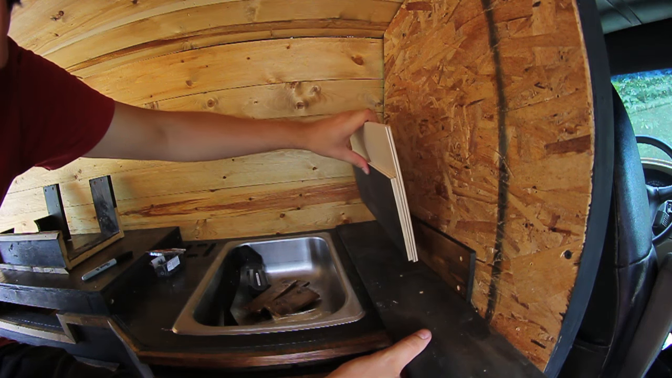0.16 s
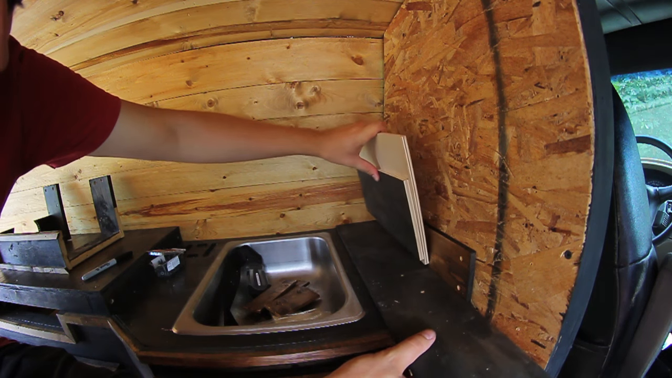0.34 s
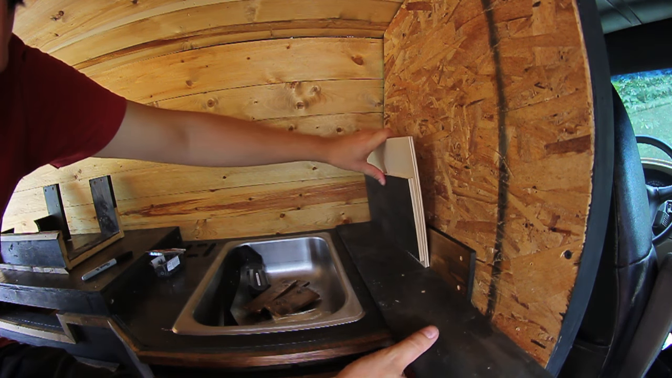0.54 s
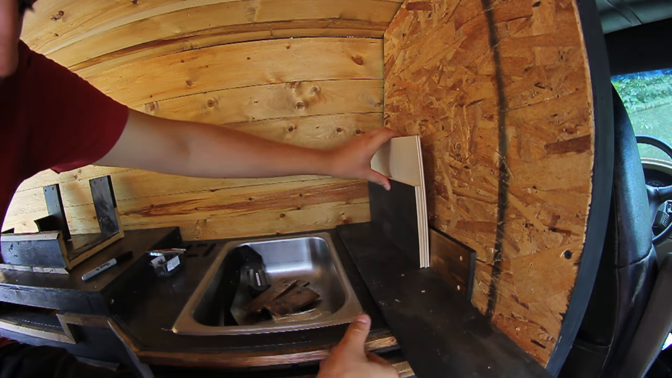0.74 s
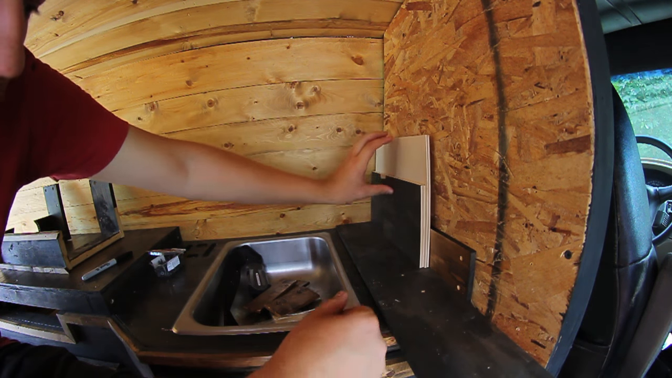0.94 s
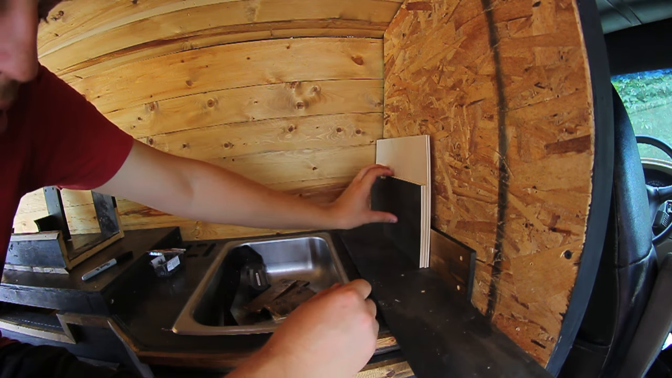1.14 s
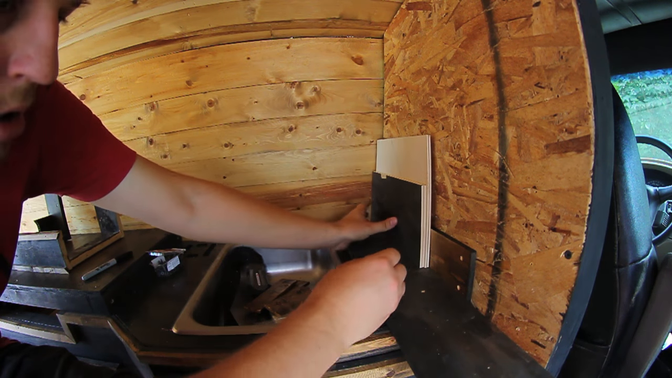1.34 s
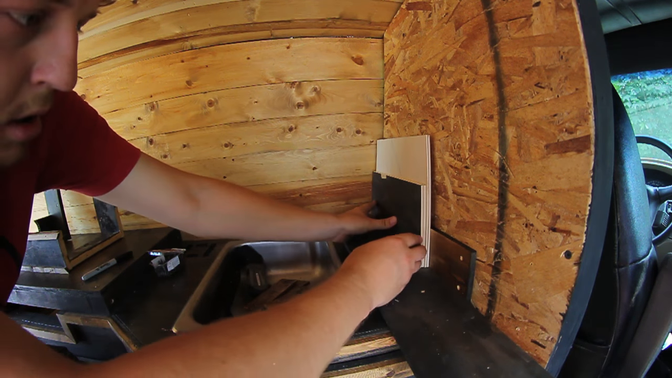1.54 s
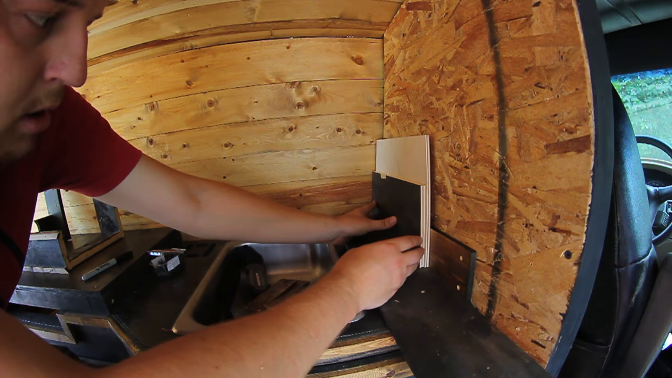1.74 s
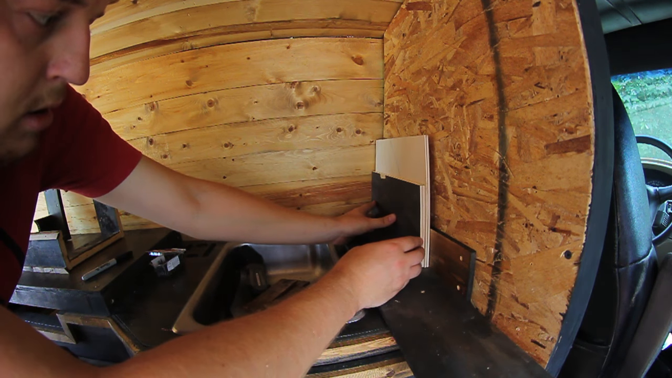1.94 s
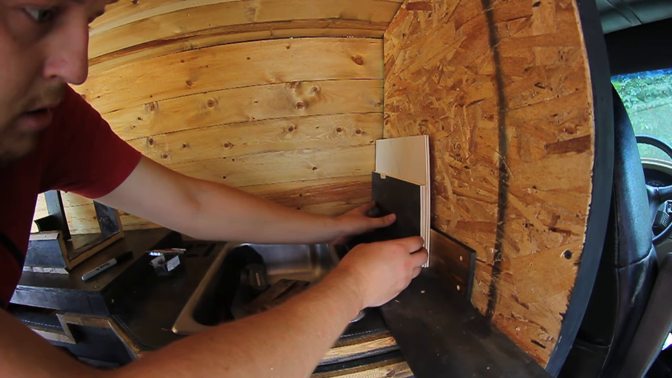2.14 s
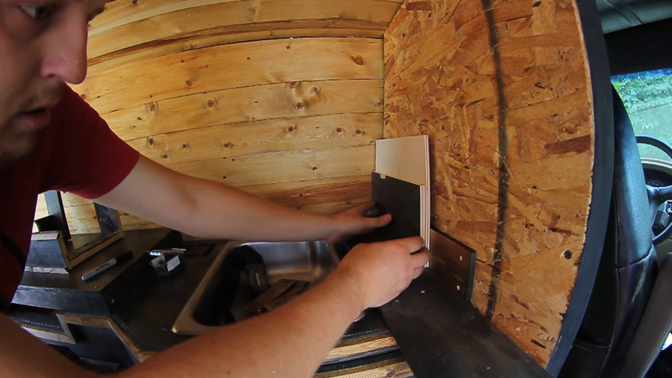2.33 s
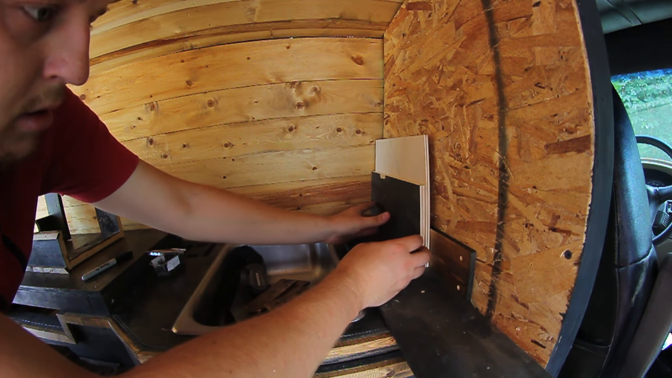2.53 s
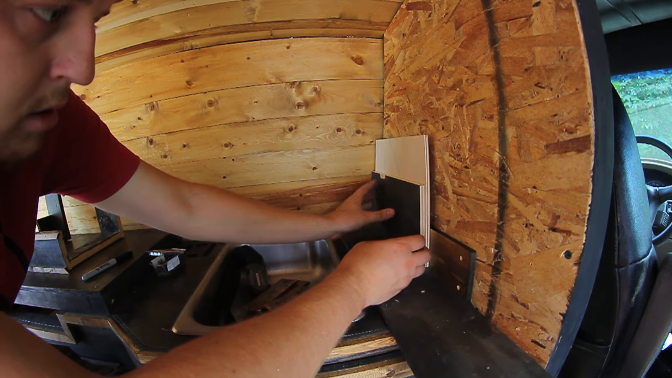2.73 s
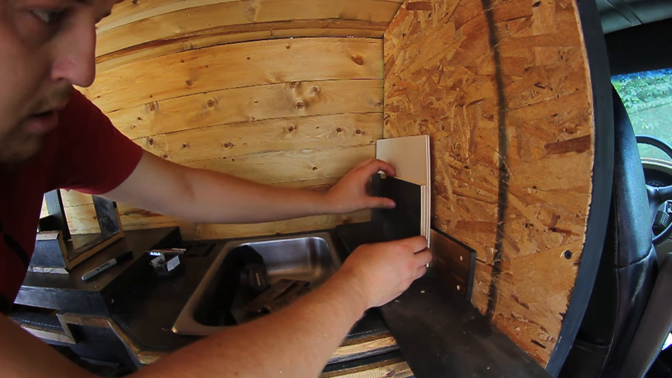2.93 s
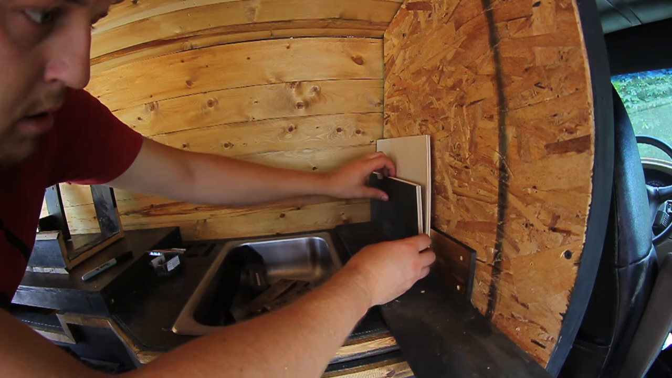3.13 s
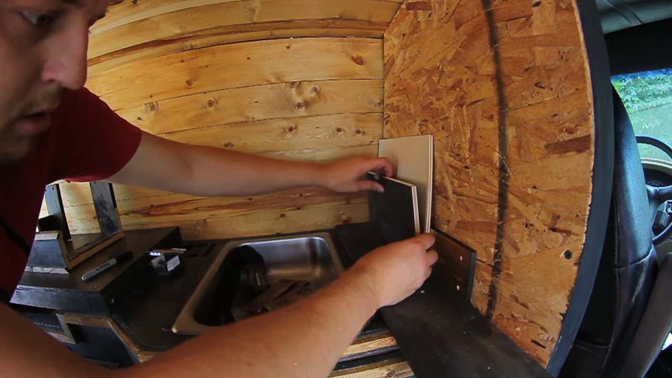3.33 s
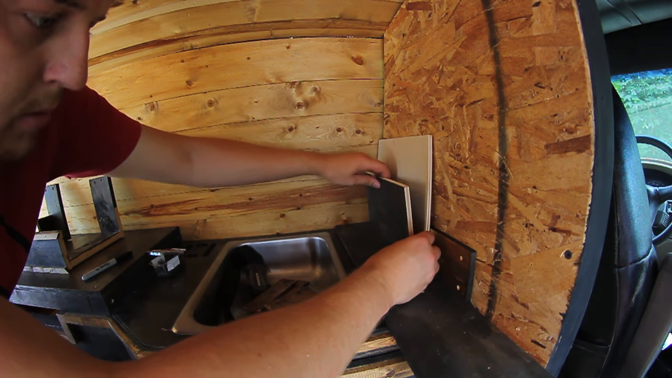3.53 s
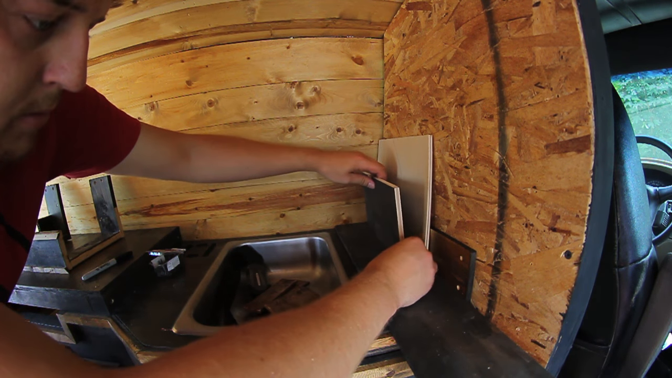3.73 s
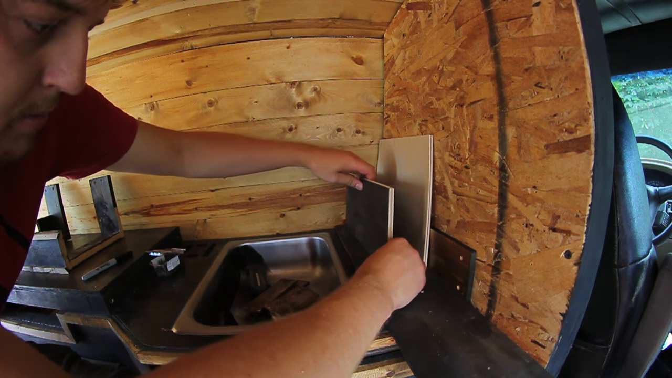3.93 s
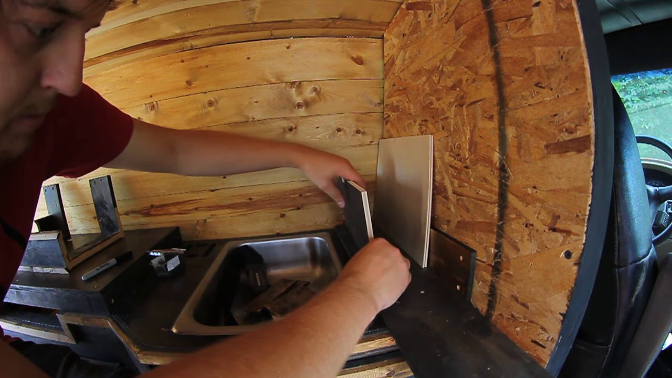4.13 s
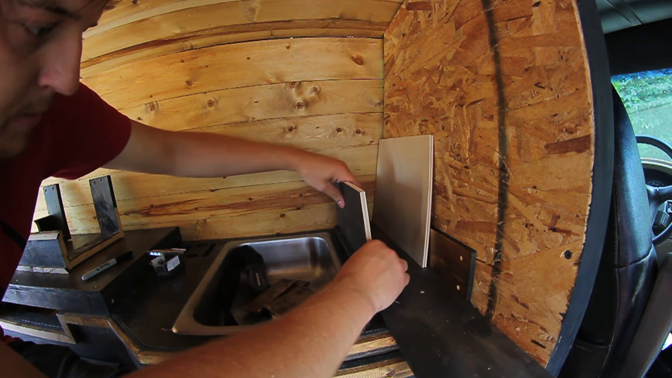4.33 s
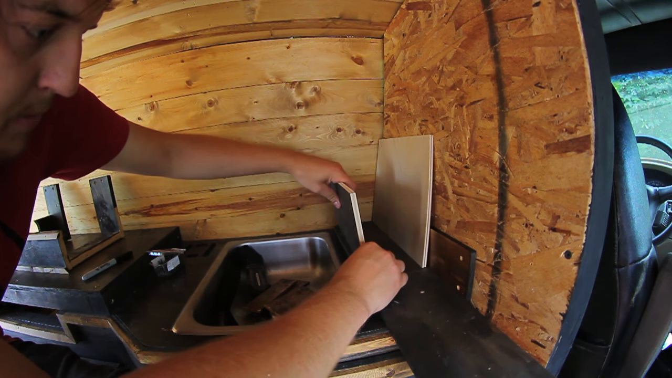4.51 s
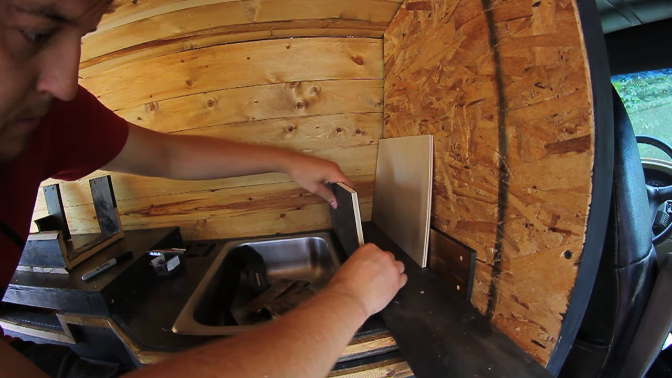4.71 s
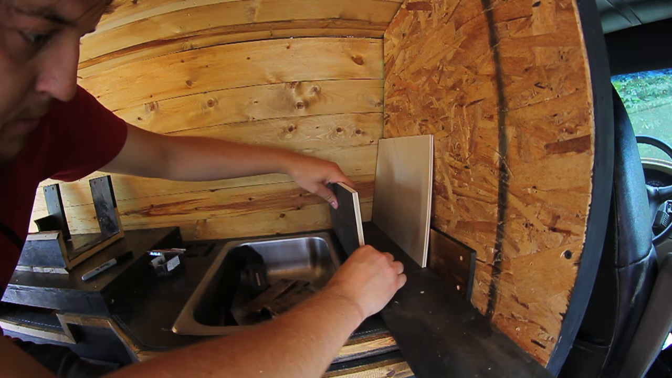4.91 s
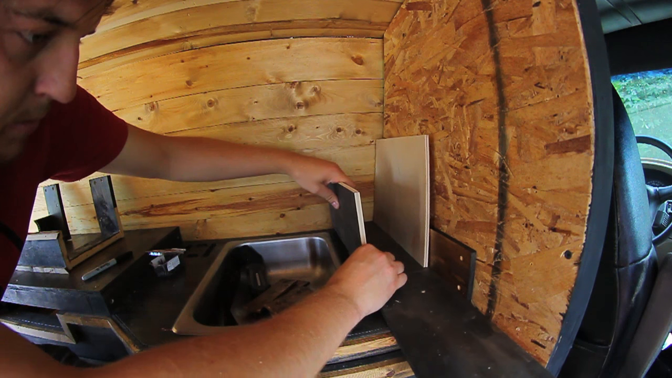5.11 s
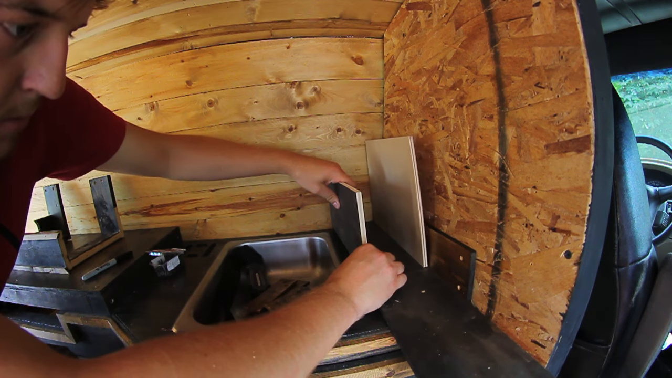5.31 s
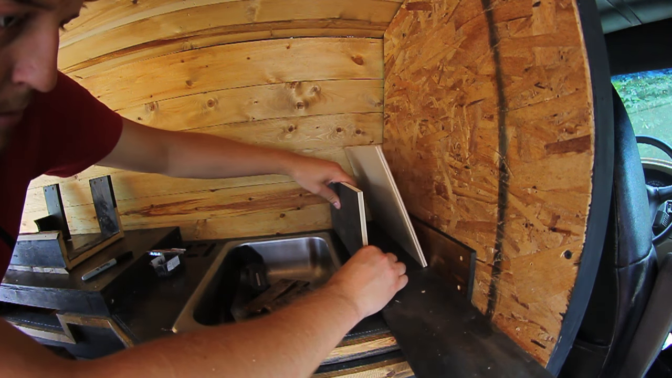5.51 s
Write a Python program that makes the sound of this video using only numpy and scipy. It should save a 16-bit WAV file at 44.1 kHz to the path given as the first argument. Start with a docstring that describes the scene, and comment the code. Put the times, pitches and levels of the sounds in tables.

```python
"""Plywood boards in a van

Two thin plywood boards are stood on a hollow counter in a small wood-lined van and slid against each
other. Each knock rings the board and thumps the cabinet under it. Between knocks edges scrape and faces
rub: a dense rain of tiny slips in the board's resonances. The van adds a short, boomy tail over a
quiet background."""
import sys
import numpy as np
from scipy import signal
from scipy.fft import rfft, irfft, next_fast_len
from scipy.io import wavfile
from scipy.ndimage import uniform_filter1d, map_coordinates

SR = 44100
rng = np.random.default_rng(int(sys.argv[2]) if len(sys.argv) > 2 else 0)


def inscribe(sig):
    """Save sig as 16-bit PCM at rate SR to the path in sys.argv[1].

    A 1-D sig is mono; a 2-D sig holds one channel per row.
    Samples are clipped to [-1, 1] before scaling.
    """
    pcm = np.round(np.clip(np.atleast_2d(sig).T, -1, 1) * 32767)
    wavfile.write(sys.argv[1], SR, pcm.astype(np.int16))


N = 245195
EVENT_N = SR  # samples per event
EVENT_TIME_S = np.arange(EVENT_N) / SR
LN_1000 = np.log(1000)  # 60 dB in nepers


def undb(db):
    """Decibels to gain."""
    return 10 ** (np.asarray(db) / 20)


def unit(x):
    """Scale to rms 1."""
    return x / np.sqrt(np.mean(x ** 2))


def unit_hit(x):
    """Scale to the energy of 10 ms at rms 1."""
    return x / np.sqrt(np.sum(x ** 2) / (SR / 100))


def at(points, hz):
    """Read (freq_hz, value) points on a log-frequency axis."""
    f, value = np.transpose(points)
    return np.interp(np.log(np.maximum(hz, 1)), np.log(f), value)


def add(out, start_s, x):
    """Mix x into out."""
    i = int(start_s * SR)
    out[i:i + len(x)] += x[:len(out) - i]


def through(x, response):
    """Filter by a complex response(freq_hz)."""
    size = next_fast_len(2 * len(x))
    return irfft(rfft(x, size) * response(np.fft.rfftfreq(size, 1 / SR)), size)[:len(x)]


def resonate(x, hz, width_hz, db=0):
    """One resonance with peak gain db."""
    return through(x, lambda f: undb(db) * 1j * f * width_hz / (hz ** 2 - f ** 2 + 1j * f * width_hz))


def lag(force, lag_s):
    """Ringing follows the rubbing force with a short lag."""
    return through(force, lambda f: 1 / (1 + 2j * np.pi * f * lag_s))


def soften(x, corner_hz, damping=1.352):
    """A yielding contact passes little above its corner."""
    return through(x, lambda f: 1 / (1 + damping * 1j * f / corner_hz - (f / corner_hz) ** 2))


def walk(rate_hz):
    """Random wander at rms 1."""
    hold = int(SR / rate_hz)
    steps = np.repeat(rng.standard_normal(N // hold + 1), hold)
    return unit(uniform_filter1d(steps, hold)[:N])


def drift(x, share):
    """Let the pitch wander by a share of itself."""
    return map_coordinates(x, [np.cumsum(1 + share * walk(11))], order=3, mode="mirror")


def ring(modes, scatter_db, detune):
    """Decaying modes: the strike point sets each size and sign, the grip shifts the pitch."""
    t, out = EVENT_TIME_S, 0
    for hz, db, t60_s in modes:
        size, shift, side = rng.standard_normal(3)
        tone = np.sin(2 * np.pi * hz * (1 + detune * shift) * t)
        out += np.sign(side) * undb(db + scatter_db * size) * tone * np.exp(-LN_1000 * t / t60_s)
    return unit_hit(out)


def dense_modes(colour, decay):
    """Countless overlapping modes: half-octave noise bands, each dying at its own rate."""
    f = np.fft.rfftfreq(EVENT_N, 1 / SR)
    noise, out = rfft(rng.standard_normal(EVENT_N)), 0
    for hz in 45 * 2 ** (np.arange(18) / 2):
        band = irfft(noise * (np.abs(np.log2((f + 1) / hz)) < 1 / 4), EVENT_N)
        fade = np.exp(-LN_1000 * EVENT_TIME_S / at(decay, hz))
        out += unit_hit(band * fade) * undb(at(colour, hz)) * np.sqrt(hz)
    return unit_hit(out)


def air(level_db=-58, drift_db=1):
    """Quiet background rumble and hiss."""
    # background spectrum: freq_hz, density_db
    colour = [(13, -26.5), (22, -1.5), (82, -13), (1740, -28.5), (2340, -33), (3940, -33), (4390, -34),
              (15000, -43)]
    gain = undb(level_db + drift_db * walk(2.7))
    return gain * unit(through(rng.standard_normal(N), lambda f: undb(at(colour, f))))


def van(x, wet_db=-18.5, delay_s=.004):
    """The small wooden cabin answers within milliseconds and holds the bass longest."""
    # tail spectrum: freq_hz, density_db
    colour = [(50, 7.5), (140, 5), (400, -2), (1200, -11.5), (5000, -9.5), (16000, -10)]
    # tail decay: freq_hz, t60_s
    decay = [(60, 1), (140, .58), (400, 0.34), (1000, 0.18), (4000, 0.17), (12000, .13)]
    tail = dense_modes(colour, decay)
    tail = np.r_[np.zeros(int(delay_s * SR)), tail / np.sqrt(np.sum(tail ** 2))]
    return x + undb(wet_db) * signal.fftconvolve(x, tail)[:N]


def ticks():
    """A splinter or fingernail snaps past an edge, too light to ring the whole board."""
    # snaps: start_s, level_db, contact_hz
    snaps = [(0.4074, -39, 12000), (.534, -37, 8000), (0.6186, -28.5, 3970), (0.7454, -46, 6000),
             (0.917, -47.5, 5980), (1.487, -50, 7000), (1.595, -42, 7000), (1.719, -46.5, 9000),
             (2.592, -54, 9000), (3.129, -42, 5500), (3.262, -36, 5500), (3.2776, -34, 6000),
             (3.294, -36.5, 5000), (3.374, -41, 4500), (4.732, -45, 5000), (5.082, -46, 4980),
             (5.326, -52.5, 4510), (5.414, -62, 4000)]
    # tick spectrum: freq_hz, density_db
    colour = [(100, -12), (700, 5.5), (2000, -2.5), (5000, 0), (8000, -8.5), (15000, -8.5)]
    # tick decay: freq_hz, t60_s
    decay = [(500, 0.043), (5000, 0.027), (12000, 0.012)]
    out = np.zeros(N)
    for start_s, db, contact_hz in snaps:
        add(out, start_s, undb(db) * unit_hit(soften(dense_modes(colour, decay), contact_hz)))
    return out


def rubbing(attack_share=.284, sag_db_per_s=15, release_s=.012,
            catch_s=.013, swell_db_per_s=300.5, brake_s=.003, finger_pressure_db=-1):
    """Yield (start_s, force, pressure_db) per gesture; pressure brings in the lower resonances."""
    # board drawn at an even pace: start_s, end_s, level_db, pressure_db
    strokes = [(0.286, 0.33, -54.5, 6), (0.328, .452, -44.5, 5), (0.533, 0.572, -38, 3.5),
               (0.618, 0.712, -37, -11), (0.746, 0.871, -40, -7.5), (1.125, 1.204, -50.5, 1),
               (1.748, 1.811, -59, 5), (2.205, 2.225, -63, -12), (2.64, 2.715, -62, -8),
               (3.252, 3.33, -44, 4.5), (3.341, 3.435, -50.5, -11.5), (3.523, 3.598, -31, -10.5),
               (3.631, 3.708, -43.5, -1.5), (3.727, 3.887, -28, -12), (3.878, 4.154, -32, -5),
               (4.161, 4.204, -46, 1.5), (4.236, 4.318, -44.5, 4), (4.352, 4.366, -38, -13.5),
               (4.423, 4.482, -53, 5.5), (4.474, 4.533, -34.5, 0), (4.617, 4.655, -40.5, 4),
               (5.046, 5.102, -56, 9.5), (5.498, 5.56, -61.5, 5)]
    # board gathering speed until stopped: start_s, stop_s, final_db, pressure_db
    shoves = [(.505, .534, -29.5, 4.5), (0.931, 0.955, -44.5, -2), (1.401, 1.462, -46, -1),
              (1.566, 1.592, -37.5, 0.5), (3.143, 3.179, -41, 2), (4.313, 4.358, -25, -2),
              (5.101, 5.157, -28, 1)]
    # edge catching and skidding off: start_s, level_db, t60_s, pressure_db
    scuffs = [(0.239, -28.5, 0.1561, -12), (2.891, -35.5, 0.2477, -1), (3.276, -43, 0.0053, -3.5),
              (4.657, -18, 0.0811, -15), (4.732, -37.5, .09, -0.5), (4.77, -45.5, 0.22, -9),
              (4.92, -48.5, 0.3056, -16.5)]
    # fingers shifting on the held board: time_s, level_db
    fingers = [(1.25, -70), (1.36, -60), (1.68, -56.5), (1.899, -66), (2.15, -78), (2.29, -74),
               (2.401, -62), (2.58, -63), (2.82, -82), (2.98, -58.5), (3.24, -49.5), (3.521, -56)]
    t = EVENT_TIME_S
    for start_s, end_s, db, pressure_db in strokes:
        length_s = end_s - start_s
        attack = np.minimum(t / (attack_share * min(length_s, .15)), 1)
        release = np.exp(-np.maximum(t - length_s, 0) / release_s)
        yield start_s, attack * undb(db - sag_db_per_s * t) * release, pressure_db
    for start_s, stop_s, db, pressure_db in shoves:
        length_s = stop_s - start_s
        attack = np.minimum(t / catch_s, 1)
        swell = undb(db - swell_db_per_s * np.maximum(length_s - t, 0))
        release = np.exp(-np.maximum(t - length_s, 0) / brake_s)
        yield start_s, attack * swell * release, pressure_db
    for start_s, db, t60_s, pressure_db in scuffs:
        yield start_s, undb(db) * np.exp(-LN_1000 * t / t60_s), pressure_db
    finger_db = np.interp(np.arange(N) / SR, *np.transpose(fingers), left=-np.inf, right=-np.inf)
    yield 0, undb(finger_db), finger_pressure_db


def fine_modes(slips, spot_s=.05, t60_s=.014):
    """The board's fine modes form a new pattern at each spot the contact crosses."""
    out, t = np.zeros(N), np.arange(SR // 20) / SR
    hop = int(spot_s * SR)
    window = np.sin(np.pi * np.arange(2 * hop) / (2 * hop))
    for i in range(0, N, hop):
        here = slips[i:i + 2 * hop]
        pattern = rng.standard_normal(len(t)) * np.exp(-LN_1000 * t / t60_s)
        add(out, i / SR, signal.fftconvolve(here * window[:len(here)], pattern))
    return out


def sliding_modes(push, peaks, drift_share=.005, wander_db=2):
    """As the contact travels, each board resonance swells, fades and shifts in pitch."""
    return unit(sum(drift(resonate(push, *peak), drift_share) * undb(wander_db * walk(16))
                    for peak in peaks))


def slides(slips_per_s=20000, spread_db=2.5, max_slip_db=9, judder_db=1, fibre_hz=7500,
           low_db=-2, high_db=-3, grain_db=-2, rumble_db=-12, skin_db=-35):
    """Fibres catch and slip, driving the board's resonances and shaking the counter."""
    # lower resonances, needing pressure: centre_hz, width_hz, gain_db
    low_peaks = [(533, 90, -0.5), (763.3, 110, 1.5), (1084, 190, -9), (1312.1, 55, 1.5), (1649, 160, -5),
                 (1965.6, 86, 0.5)]
    # upper resonances: centre_hz, width_hz, gain_db
    high_peaks = [(2866, 210, -7), (3581, 390, 0.5), (3898, 110, -6.5), (4415, 190, 0.5), (4887, 200, -3),
                  (5240, 240, 1.5), (5732, 330, -6)]
    # fibre slip spectrum: freq_hz, density_db
    grain_colour = [(100, -20), (350, -3.5), (800, 1), (2400, -2.5), (3600, 1), (5400, -4.5), (7000, -9),
                    (9000, -15.5), (12000, -17.5), (16000, -31.5)]
    rub, pressed = np.zeros(N), np.zeros(N)
    for start_s, force, pressure_db in rubbing():
        add(rub, start_s, force)
        add(pressed, start_s, force * undb(pressure_db))
    sizes = undb(np.minimum(spread_db * rng.exponential(size=N), max_slip_db))
    impulses = (rng.random(N) < slips_per_s / SR) * rng.choice([-1, 1], N)
    slips = unit(impulses * sizes * undb(judder_db * walk(120)))
    push = soften(slips, fibre_hz)
    low = undb(low_db) * sliding_modes(push, low_peaks)
    high = undb(high_db) * sliding_modes(push, high_peaks)
    grain = undb(grain_db) * unit(through(fine_modes(slips), lambda f: undb(at(grain_colour, f))))
    rumble = undb(rumble_db) * unit(resonate(slips, hz=114.28, width_hz=59))
    # fingers creeping on wood: thin hiss, growing slowly with force
    skin = np.sqrt(np.abs(rub)) * resonate(slips, hz=10360, width_hz=4700, db=skin_db)
    return lag(pressed, lag_s=.011) * (low + rumble) + lag(rub, lag_s=.002) * (high + grain) + skin


def bending(hz, ring_cycles=26, grip_t60_s=.12, knee_hz=504.7, fall_db_per_oct=4.5):
    """The board flexes, damped by the hand; held tightly, it bends higher and less."""
    t = EVENT_TIME_S
    fade = np.exp(-LN_1000 * t * (hz / ring_cycles + 1 / grip_t60_s))
    gain = undb(-fall_db_per_oct * max(np.log2(hz / knee_hz), 0))
    return gain * unit_hit(build_up(np.sin(2 * np.pi * hz * t) * fade))


def build_up(x, rise_s=.00206):
    """Heavier motions take a moment to start."""
    return x * (1 - np.exp(-EVENT_TIME_S / rise_s))


def cabinet(modes_db=-2, panels_db=-3):
    """The hollow cabinet thumps under a blow."""
    # main modes: pitch_hz, level_db, t60_s
    modes = [(54.31, -14, .45), (103.86, -13, 0.15), (123.85, -4.5, .14), (142, -0.5, 0.12),
             (175.07, -7, 0.2), (229.06, -1, 0.11), (310.6, -4.5, .17), (345, -6.5, 0.17)]
    # weaker panel modes: freq_hz, density_db
    colour = [(45, -12.5), (80, -7.5), (130, -1.5), (300, -5), (500, -7), (900, -28.5), (2000, -65),
              (16000, -90)]
    # panel decay: freq_hz, t60_s
    decay = [(60, 0.28), (300, 0.18), (1000, 0.12)]
    boom = undb(modes_db) * ring(modes, scatter_db=2, detune=.01812)
    return build_up(boom + undb(panels_db) * dense_modes(colour, decay))


def board(modes_db=-3, dense_db=-2, tick_db=-3, tick_s=.000077):
    """Struck plywood ticks at the contact and rings."""
    # main modes: pitch_hz, level_db, t60_s
    modes = [(427.3, -8, 0.047), (527.4, 4.5, 0.064), (619.5, -5.5, 0.059), (723.3, -9.5, .1),
             (777.4, 1, 0.053), (918, 0.5, 0.04), (1106.7, -2, 0.029), (1189.8, -3.5, 0.068),
             (1434, -5.5, 0.071), (1629.5, -9, 0.041), (1810, 3.5, 0.038), (2236, -8, .07),
             (2395.3, -4.5, .07), (3106, -1, .035), (3536, -5, .04), (4960, -3.5, .025)]
    # dense wood modes: freq_hz, density_db
    colour = [(60, -25), (150, -8.5), (300, -3.5), (550, 7), (1000, 2), (1700, -2), (2600, -16),
              (4200, -4.5), (7000, -5.5), (16000, -25.5)]
    # their decay: freq_hz, t60_s
    decay = [(100, .16), (500, 0.073), (1500, 0.085), (4000, .028), (10000, 0.018)]
    t = EVENT_TIME_S
    tick = undb(tick_db) * unit_hit((1 - t / tick_s) * np.exp(-t / tick_s))
    ringing = undb(modes_db) * ring(modes, scatter_db=2, detune=.00906)
    return tick + ringing + undb(dense_db) * dense_modes(colour, decay)


def knocks(rebound_s=.005, rebound_spread=.2, rebound_db=-10):
    """Each blow rings the board, thumps the cabinet and bounces once; soft contact cuts the treble."""
    # blows: start_s, level_db, contact_hz, bend_hz, thump_db
    blows = [(.005, -49.5, 293, 134.2, 8.5), (.2418, -21.5, 1110, 421, 3.5), (.2501, -20, 1674, 306.7, 0),
             (.258, -20.5, 1100, 159.2, 3.5), (.278, -22, 600, 310, 0.5), (.349, -24, 1000, 319.5, 5),
             (.384, -22.5, 1974, 1582, 0.5), (.408, -30, 450, 217.4, 0), (.453, -31, 1090, 539.5, 5.5),
             (.532, -24.5, 940, 204.4, 4), (.548, -24, 620, 202, -1), (.5798, -13, 4400, 1566, -3),
             (.6125, -16.5, 2120, 501.4, -8.5), (.6957, -12, 1313, 877.7, -18.5),
             (.865, -43.5, 2020, 472, 4.5), (.950, -35.5, 1508, 92.2, -1), (1.356, -40, 967, 542, 3.5),
             (1.488, -43, 400, 105.3, -5), (1.579, -37, 900, 98, -6), (1.598, -30, 520, 502, 7),
             (1.616, -35, 467, 145, 1.5), (1.72, -42, 353.5, 198.5, -2.5), (2.894, -44, 300, 162, 1),
             (3.1289, -34, 3197, 1479, -11), (3.2626, -30, 2200, 867, -8), (3.3212, -22, 650, 139.8, -11),
             (3.328, -26, 1990, 906, -18.5), (3.824, -32.5, 700, 535, -7.5), (3.893, -17, 754, 493.2, -7),
             (4.146, -32, 750, 225.3, 0), (4.199, -34, 396, 145.3, -3), (4.361, -20.5, 910, 409.6, -5),
             (4.498, -30.5, 597, 124, -3), (4.525, -35, 750, 340, 4.5), (4.6567, -28, 2500, 499.2, 3.5),
             (4.777, -31, 686.5, 292.3, 4.5), (5.1158, -24, 1073, 421, -6.5),
             (5.135, -27.5, 800, 562, -5.5), (5.16, -21.5, 1900, 330, -4), (5.399, -50, 897, 396, -3.5),
             (5.414, -52, 901, 397.3, -0.5), (5.523, -52.5, 806, 398, 5)]
    out = np.zeros(N)
    for start_s, db, contact_hz, bend_hz, thump_db in blows:
        wood = board()
        knock = wood + bending(bend_hz) + undb(thump_db) * cabinet()
        delay_s = rebound_s * np.exp(rebound_spread * rng.standard_normal())
        add(knock, delay_s, undb(rebound_db) * wood)
        add(out, start_s, undb(db) * soften(knock, contact_hz))
    return out


def scene():
    """Knocks, ticks and slides inside the van, mono."""
    return (air() + van(knocks() + ticks() + slides()))[None]


def record(dry, ceiling=.88, top_hz=15850):
    """Clip just under full scale, then low-pass."""
    lowpass = signal.ellip(10, .2, 80, top_hz, fs=SR, output="sos")
    return signal.sosfilt(lowpass, np.clip(dry, -ceiling, ceiling))


dry = scene()
out = record(dry)
inscribe(out)
```